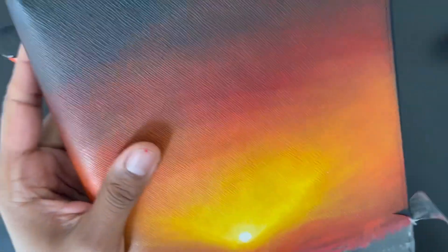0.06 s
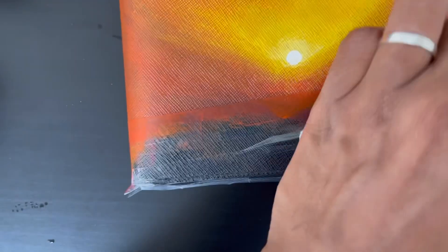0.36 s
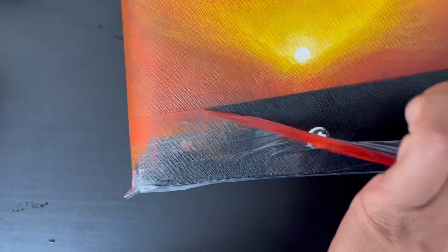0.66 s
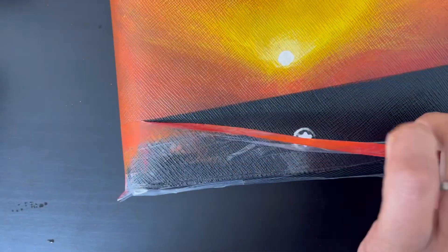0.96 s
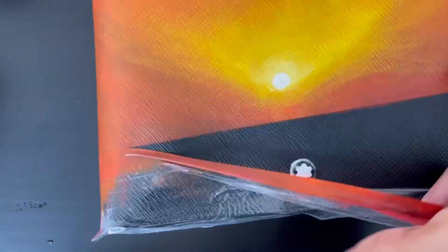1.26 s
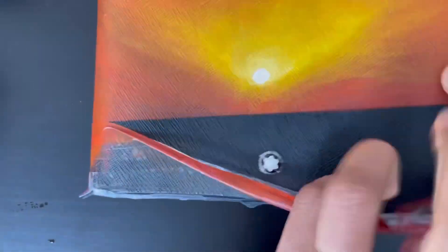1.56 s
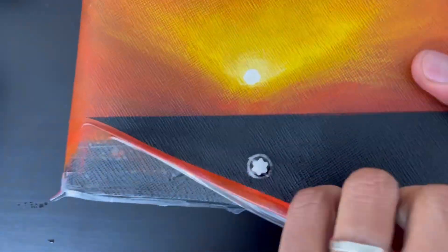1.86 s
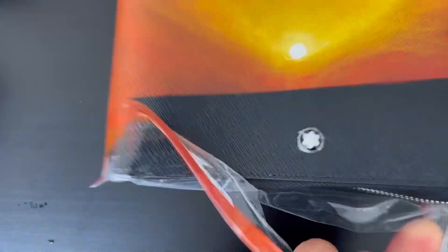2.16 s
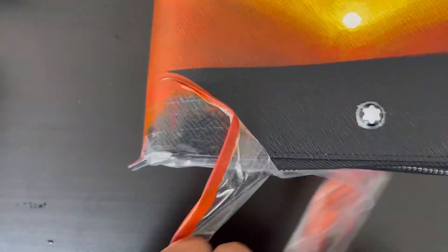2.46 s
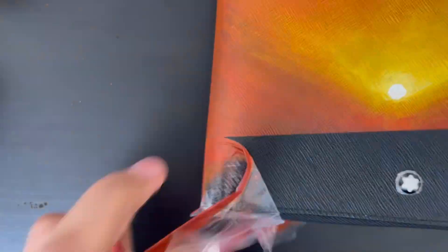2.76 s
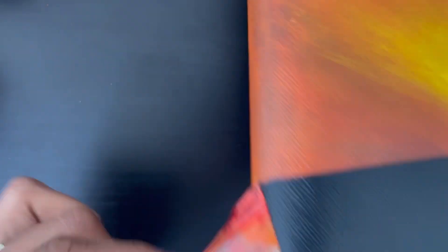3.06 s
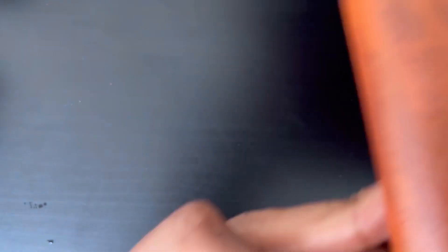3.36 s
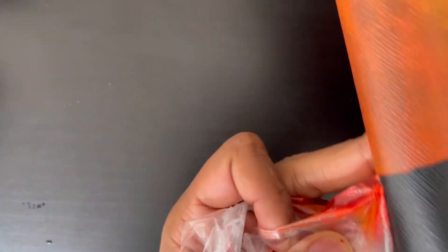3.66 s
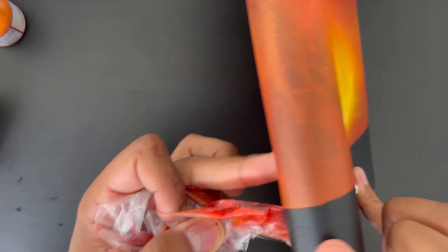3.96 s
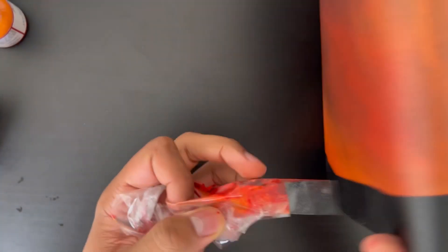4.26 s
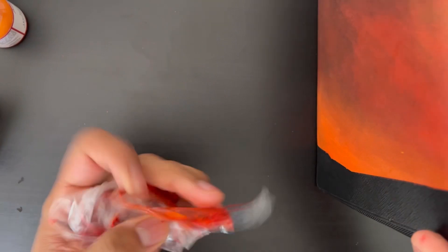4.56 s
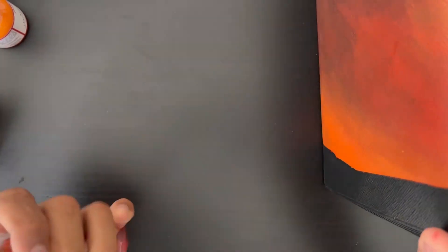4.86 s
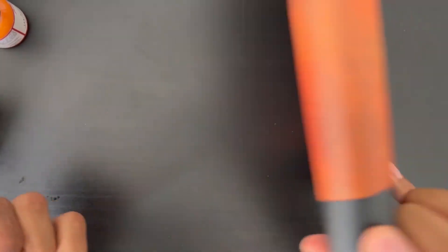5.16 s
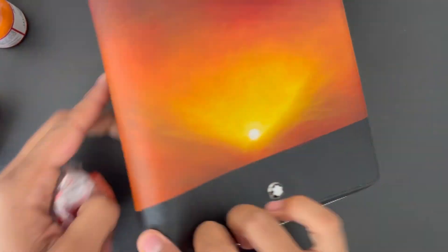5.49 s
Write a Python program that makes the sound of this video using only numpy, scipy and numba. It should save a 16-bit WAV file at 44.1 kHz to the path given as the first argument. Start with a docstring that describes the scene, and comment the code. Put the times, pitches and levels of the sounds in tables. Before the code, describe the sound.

After a brief, dull slide of leather on skin, sticky tape peels away from a wallet with soft, irregular crackles and a thin fizz. The final piece comes loose in a louder, stuttering rip with a few hollow taps on the leather. A hand then squeezes the loose plastic strip, giving crisp crinkles over a faint low rubbing. Everything is heard up close in a small, quiet room.

```python
"""Tape peeled off a leather wallet

Close to the microphone, in a small, quiet room, adhesive tape is pulled off a hand-held wallet: the glue
fizzes and lets go in ticks and short rips. The last end tears free with a stutter that drums on the
leather, then the strip is crumpled in one hand and its creases buckle."""
import sys
import numpy as np
from scipy import signal
from scipy.fft import rfft, irfft, next_fast_len
from scipy.io import wavfile
from scipy.ndimage import uniform_filter1d, map_coordinates
from numba import njit

SR = 44100
rng = np.random.default_rng(int(sys.argv[2]) if len(sys.argv) > 2 else 0)


def master_out(mix):
    """Clip the mix to full scale and print it as 16-bit PCM to the path in sys.argv[1]."""
    frames = np.transpose(np.atleast_2d(mix))
    ceiling = np.clip(frames, -1, 1)
    pcm = np.round(ceiling * 32767).astype(np.int16)
    wavfile.write(sys.argv[1], SR, pcm)


N = 243673
TOP_HZ = 16100  # upper limit of the microphone's band


# Rasp of the taut strip, heard close: (frequency [Hz], level [dB])
RASP_SPECTRUM = [(150, -12), (500, -11), (900, 0), (1500, -3), (2300, -0.5), (3300, -2.5), (5500, -16),
                 (10000, -41.5)]
# Fizz of the parting glue, heard close: (frequency [Hz], level [dB])
FIZZ_SPECTRUM = [(2000, -37), (4000, -9), (6000, 0), (8300, 6), (11000, -0.5), (14000, 9.5), (16000, -4)]
def peeling_front(rasp_db, fizz_db):
    """Countless glue strands part close to the microphone: the strip rasps and the front fizzes."""
    strands = grains(rate=3100, spread_db=6.5)
    rasp = amp(-2) * coloured(grains(rate=4000, spread_db=7.5), RASP_SPECTRUM)
    rasp += amp(-9.5) * taut_strip(strands, q=4.3)
    fizz = coloured(strands + grains(rate=660, spread_db=9.5), FIZZ_SPECTRUM)
    stick_slip = amp(2.92 * wobble(rate=70))
    rasp = amp(rasp_db - 1) * flexing(rasp, depth_db=4)
    fizz = amp(fizz_db + 0.5) * flexing(fizz, depth_db=3.5)
    return stick_slip * (rasp + fizz)


# Pulls of the hand on the tape: (start [s], length [s], rasp level [dB], fizz level [dB])
HAND_PULLS = [(.12, 0.018, -70, -66.5), (0.433, 0.13, -73, -67), (0.543, .1, -64, -67),
              (0.671, 0.337, -75.5, -70.5), (1.097, 0.45, -77.5, -75), (1.576, 0.066, -68.5, -77),
              (1.873, 0.11, -78, -66.5), (2.001, 0.059, -59.5, -69), (2.152, 0.097, -74, -73.5),
              (2.299, 0.4, -69, -70.5), (2.759, .06, -73, -67), (2.851, 0.28, -67.5, -66),
              (3.146, 0.081, -74.5, -71.5), (3.382, 0.056, -71.5, -73.5), (3.553, 0.066, -80.5, -70.5)]
def front_level(column, run_on_db):
    """Rasp (column 2) or fizz (3) in dB: the front moves with each pull and runs on after each tick."""
    pulls = [(row[0], row[1], row[column]) for row in HAND_PULLS]
    creep = (0.13, 3.58, -82.5)  # the stretched tape keeps creeping between pulls
    pulled = strokes(pulls + [creep], attack_s=0.019, release_t60=0.26)
    runs = [(row[0], 0.012, row[column] + run_on_db) for row in GLUE_TICKS]
    run_on = strokes(runs, attack_s=0.0026, release_t60=0.133)
    return decibels(np.hypot(pulled, run_on))


# The thickest glue strands letting go: (time [s], pitch [Hz], snap level [dB], crack level [dB])
GLUE_TICKS = [(0.3514, 3420, -65, -75), (0.5827, 2570, -51, -65), (0.6987, 2270, -49.5, -47),
              (0.7791, 2950, -58.5, -46.5), (0.8528, 3020, -54.5, -55), (0.8988, 1530, -57, -54.5),
              (0.9409, 1400, -64.5, -77), (1.0667, 2300, -56, -61.5), (1.1017, 5670, -60, -57),
              (1.1322, 2820, -53, -52), (1.1843, 3050, -55.5, -44), (1.2441, 1980, -48, -46),
              (1.3564, 3300, -68, -57), (1.4215, 2420, -55, -67), (1.5187, 2740, -52.5, -46.5),
              (1.575, 2080, -46, -40.5), (1.8993, 890, -52.5, -71), (1.97, 5720, -62.5, -59),
              (2.1623, 2130, -53.5, -45.5), (2.34, 1126, -61.5, -69), (2.508, 2170, -55, -58),
              (2.5658, 1910, -50.5, -48.5), (2.6496, 5430, -59, -51.5), (2.6556, 1870, -58, -53),
              (2.7707, 2440, -53, -52), (2.8505, 3020, -56.5, -54), (2.8909, 2570, -48.5, -69),
              (2.9921, 2140, -59, -49.5), (3.1069, 1630, -56, -48.5), (3.1409, 4700, -67, -50),
              (3.2549, 3780, -62, -57.5), (3.3371, 1625, -56, -50.5), (3.7105, 2060, -58.5, -58),
              (3.943, 4620, -44, -49), (3.959, 2700, -58, -48), (3.9703, 4640, -39, -47),
              (3.9832, 4050, -41.5, -48), (3.991, 3930, -50, -51), (4.0054, 4660, -36.5, -53)]
def glue_ticks(front_db):
    """Thick strands break one by one and flick the film, with smaller ones scattered between."""
    small = strays(front_db, count=230, pitch_hz=2430, pitch_spread=0.49,
                   over_db=0, spread_db=4, crack_db=0.5)
    return snaps(np.vstack([GLUE_TICKS, small]), q=3.25, rise_s=0.00018, crack_hz=11650,
                 crack_rise_s=0.000088, flutter_db=-9, flutter_t60=0.028)


# Short rips along the wallet: (start [s], length [s], relative level [dB])
GLUE_RIPS = [(.700, .012, -56.5), (1.510, 0.016, -55), (1.568, 0.0078, -52.5), (1.575, 0.0058, -57),
             (2.143, 0.0264, -45), (2.888, 0.019, -48)]
def glue_rips():
    """A stretch of glue gives way at once, in a dense burst of rasp and fizz."""
    strands = grains(rate=9300, spread_db=7)
    tearing = coloured(strands, RASP_SPECTRUM) + coloured(strands, FIZZ_SPECTRUM)
    return amp(-9.5) * bursts(GLUE_RIPS, release_t60=0.0085) * tearing


# Resonance of the strip between hand and wallet: (time [s], pitch [Hz])
STRIP_PITCH = [(.47, 5730), (.58, 2900), (.66, 2070), (1.12, 3030), (2.04, 2270), (2.4, 1720), (2.85, 2570),
               (3.2, 1460), (3.92, 4500), (4.16, 5330)]
def taut_strip(x, q):
    """The stretched strip rings, lower as the freed length grows and higher with tension."""
    pitch_hz, = curves(STRIP_PITCH)
    tuning = 2 * np.sin(np.pi * pitch_hz / SR)
    return unit(glide(x, tuning, 1 / q) / np.sqrt(tuning))


# The film under tension, heard close: (frequency [Hz], level [dB])
TAUT_SPECTRUM = [(500, -12), (1500, -5), (2300, -0.5), (3400, 5), (4000, -3.5), (5100, 9.5), (6200, 6),
                 (7200, -9.5), (9000, -7.5), (12000, -10), (16000, -47)]
# The film slack in the hand: (frequency [Hz], level [dB])
SLACK_SPECTRUM = [(500, -14.5), (1200, -3.5), (2200, -5.5), (3300, 6.5), (4200, -11.5), (5600, 0.5),
                  (7000, -14), (8600, -3.5), (11000, -15.5), (16000, -52)]
# Many creases collapsing together: (start [s], length [s], level [dB])
COLLAPSES = [(4.013, 0.0047, -46), (4.151, 0.0088, -40.5), (4.582, 0.0025, -36), (4.859, 0.0079, -38.5),
             (5.076, 0.0025, -37)]
def crumpling(rub_db, crinkle_db):
    """The last end scrapes free through the taut strip; then the slack, lower film buckles in clumps."""
    slack, = curves([(4.3, 0.014), (4.56, 0.79)])

    def film(x):
        return (1 - slack) * coloured(x, TAUT_SPECTRUM) + slack * coloured(x, SLACK_SPECTRUM)

    gripped = np.arange(N) / SR > LAST_TEAR[0][0]
    buckles = grains(rate=4000, spread_db=8) * amp(3 * wobble(rate=170))
    scrape = (1 - slack) * amp(-1) * taut_strip(rng.standard_normal(N), q=6.5)
    crinkle = amp(crinkle_db) * flexing(film(buckles) + scrape, depth_db=3.5)
    rub = rubbing(buckles, rub_db)
    collapses = bursts(COLLAPSES, release_t60=0.014) * film(rng.standard_normal(N))
    return gripped * (crinkle + rub) + collapses


# The last end scraping off the wallet: (time [s], rub level [dB], crinkle level [dB])
LAST_TEAR = [(3.904, -88, -70), (3.918, -60, -51.5), (3.96, -55.5, -53), (4.022, -47, -41),
             (4.095, -58, -52.5), (4.16, -47, -41), (4.2, -47.5, -46.5), (4.24, -43, -46),
             (4.258, -56.5, -63.5), (4.355, -58.5, -56.5), (4.41, -66, -68), (4.48, -66.5, -62)]
# Fingers closing on the loose strip: (start [s], length [s], level [dB])
FINGER_SQUEEZES = [(4.555, 0.044, -43), (4.675, 0.022, -47), (4.765, 0.044, -46.5), (4.855, 0.035, -44),
                   (4.942, 0.028, -46), (5.075, 0.019, -57), (5.205, 0.0097, -59.5), (5.35, 0.027, -48)]
def crumple_levels():
    """Rub and crinkle in dB: first the tear, then the fist; each large crease sets neighbours buckling."""
    tear_rub_db, tear_crinkle_db = curves(LAST_TEAR)
    steady_grip = (4.56, 0.898, -54.5)
    pressure = strokes(FINGER_SQUEEZES + [steady_grip], attack_s=0.006, release_t60=0.24)
    neighbours = [(s, 0.01, db - 16.5) for s, _, db in LARGE_CREASES]
    spread = strokes(neighbours, attack_s=0.00081, release_t60=0.12)
    rub = np.hypot(amp(tear_rub_db), amp(-12) * pressure)
    crinkle = np.hypot(amp(tear_crinkle_db), np.hypot(pressure, spread))
    return decibels(rub), decibels(crinkle)


# The largest creases buckling near the microphone: (time [s], pitch [Hz], relative level [dB])
LARGE_CREASES = [(0.0454, 4440, -45), (4.1221, 5950, -40.5), (4.155, 5650, -28.5), (4.2102, 2280, -40.5),
                 (4.4625, 5100, -51), (4.5173, 2460, -47.5), (4.5234, 3970, -44.5), (4.5595, 5200, -39),
                 (4.5842, 3400, -34.5), (4.6056, 4360, -42), (4.6579, 4400, -44), (4.7282, 3770, -42.5),
                 (4.7508, 3530, -42.5), (4.7798, 5700, -33.5), (4.8085, 3170, -39), (4.818, 3230, -40.5),
                 (4.841, 3800, -44), (4.8632, 3480, -33.5), (4.8797, 1300, -34), (4.9207, 5840, -42.5),
                 (4.9424, 2800, -40.5), (4.9532, 2980, -35.5), (4.9584, 2170, -33), (4.9842, 3100, -35),
                 (5.017, 5720, -34.5), (5.0427, 3000, -39.5), (5.0774, 5000, -34.5), (5.15, 4100, -41),
                 (5.1671, 2700, -39.5), (5.1711, 2600, -44), (5.2271, 3100, -43), (5.272, 2870, -44),
                 (5.2945, 2360, -37.5), (5.334, 2960, -39), (5.3592, 4970, -35.5), (5.396, 2740, -42),
                 (5.4685, 3080, -46.5)]
def creases(crinkle_db, lag_s=0.002, second_db=-4.5, crack_db=-9.5):
    """Large creases give way in two snaps, small ones in one; the closed fingers shade the top octave."""
    small = strays(crinkle_db, count=520, pitch_hz=4300, pitch_spread=0.55,
                   over_db=-5.5, spread_db=-0.5, crack_db=6)
    s, pitch_hz, db = np.transpose(LARGE_CREASES)
    lag, detune = rng.lognormal(0, 0.25, (len(s), 2)).T
    first = np.transpose([s, pitch_hz, db, db + crack_db])
    second = np.transpose([s + lag_s * lag, pitch_hz * detune, db + second_db, db + second_db + crack_db])
    buckling = snaps(np.vstack([first, second, small]), q=2.3, rise_s=0.00031, crack_hz=7740,
                     crack_rise_s=0.00047, flutter_db=-28, flutter_t60=0.038)
    fingers = signal.butter(2, 10500, fs=SR, output="sos")
    return amp(-2.5) * signal.sosfilt(fingers, buckling)


# Dull rub of the gripped tape: (frequency [Hz], level [dB])
RUB_SPECTRUM = [(100, -14.5), (250, 3.5), (400, -4), (650, 5), (1200, 0), (2000, -2.5), (4000, -18.5)]
def rubbing(buckles, rub_db):
    """The tape rubs as it buckles, a low grainy sound under the crinkle."""
    return amp(rub_db - 1) * coloured(buckles + grains(rate=1700, spread_db=5), RUB_SPECTRUM)


def stutter(start_s=4.2102, count=7, slips_per_s=195, pitch_hz=520):
    """Just before it parts, the last patch of glue sticks and slips in a quick run of dull snaps."""
    tone, size = rng.standard_normal((count, 2)).T
    times = start_s + np.arange(count) / slips_per_s
    snap_db, crack_db = -42 + 1.7 * size, -49 + 1.8 * size
    rows = np.transpose([times, pitch_hz * np.exp(0.15 * tone), snap_db, crack_db])
    return snaps(rows, q=1, rise_s=0.00037, crack_hz=3500,
                 crack_rise_s=0.00025, flutter_db=-18, flutter_t60=0.04)


# Tugs that drum on the wallet: (time [s], level [dB], pitch [Hz])
WALLET_TUGS = [(1.244, -65.5, 215), (1.321, -62.5, 216), (1.598, -62, 218), (1.638, -59, 213.7),
               (2.155, -59, 209), (2.186, -59.5, 212), (2.65, -62.5, 202), (2.893, -50.5, 206),
               (3.227, -60.5, 204), (3.338, -58.5, 203), (3.414, -62, 212), (4.017, -43, 270),
               (4.222, -30.5, 407), (4.2411, -27, 325), (4.266, -38.5, 320)]
# Modes of the leather panel: (multiple of the pitch, relative level [dB], t60 at a 200 Hz pitch [s])
WALLET_MODES = [(1.002, 2, 0.12), (1.4, -4, 0.16), (2.13, -3.5, 0.094)]
def wallet():
    """Each tug rings the leather panel, higher where the grip stiffens it."""
    out, t = np.zeros(N), np.arange(SR // 5) / SR
    attack = 1 - np.exp(-t / 0.0013)
    for s, db, pitch_hz in WALLET_TUGS:
        damping = (pitch_hz / 200) ** 2.3  # a firmer grip also kills the ring sooner
        ring = np.zeros(len(t))
        for ratio, mode_db, t60 in WALLET_MODES:
            decay = amp(mode_db + rng.normal() - 60 * t * damping / t60)
            ring += decay * np.sin(2 * np.pi * pitch_hz * ratio * t)
        add(out, s, amp(db) * ring * attack)
    return out


# The wallet sliding in the hand: (time [s], level [dB])
WALLET_SLIDE = [(0, -48.5), (.135, -60), (.145, -100)]
# Leather on skin, heard close: (frequency [Hz], level [dB])
LEATHER_SPECTRUM = [(20, -11), (50, 3.5), (130, -7), (215, 1), (330, -12.5), (750, -16), (2200, -25.5),
                    (6700, -24), (12000, -37), (15000, -64)]
# Rumble of the fist near the microphone: (frequency [Hz], level [dB])
FIST_SPECTRUM = [(20, -7), (48, -5), (70, -6.5), (110, -12.5), (200, -16.5), (400, -19.5), (1000, -69)]
def hands():
    """Leather slides over skin at first; later the working fist rumbles softly."""
    slide_db, = curves(WALLET_SLIDE)
    fist_db, = curves([(3.9, -110), (3.92, -56.5), (4.25, -61), (4.45, -60),
                       (4.9, -62), (5.15, -62), (5.5, -62.5)])
    slide = amp(slide_db) * noise(LEATHER_SPECTRUM)
    rumble = amp(fist_db + 0.98 * wobble(rate=12)) * noise(FIST_SPECTRUM)
    return slide + rumble


# Decay of the small room: (frequency [Hz], t60 [s])
ROOM_DECAY = [(370, 0.36), (1200, 0.2), (4000, 0.26), (12000, 0.16)]
def room(x, delay_s=0.004):
    """The walls return a short diffuse tail to the microphone, each frequency dying at its own speed."""
    hz, t, spectra = signal.stft(rng.standard_normal(SR // 2), SR, nperseg=256)
    decay = amp(-60 * t / along(ROOM_DECAY, hz)[:, None])
    tail = signal.istft(spectra * decay, SR, nperseg=256)[1]
    tail = np.concatenate([np.zeros(int(delay_s * SR)), tail])
    return signal.fftconvolve(x, tail / np.linalg.norm(tail))[:N]


# The quiet room around the microphone: (frequency [Hz], level [dB])
ROOM_TONE_SPECTRUM = [(26, -31), (41, 11), (65, -23.5), (135, 4), (480, -10.5), (650, -6), (1200, -18.5),
                      (15000, -37)]
def room_tone():
    """A faint, low, steady noise lies behind everything."""
    return amp(-77) * noise(ROOM_TONE_SPECTRUM)


def snaps(rows, q, rise_s, crack_hz, crack_rise_s, flutter_db, flutter_t60):
    """Each (s, Hz, snap dB, crack dB) row shakes a patch of film: a bright crack, a ring, a flutter."""
    out, t = np.zeros(N), np.arange(1024) / SR

    def at_level(x, db):  # as much energy as 3 ms at this level
        return amp(db) * x * np.sqrt(0.003 * SR / np.sum(x ** 2))

    def swell(peak_s):
        return t / peak_s * np.exp(1 - t / peak_s)

    for s, pitch_hz, snap_db, crack_db in rows:
        patch_noise, crack_noise = rng.standard_normal((2, len(t)))
        flutter = amp(flutter_db - 60 * t / flutter_t60)
        # the patch flips over in a cycle or two, then shivers
        flip = swell(rise_s) * np.sin(2 * np.pi * pitch_hz * t)
        shiver = resonance(3 * patch_noise * (swell(rise_s) + flutter), pitch_hz, q, skirt_q=0.32)
        edge_hz = min(crack_hz * rng.lognormal(0, 0.31), TOP_HZ)
        crack = resonance(crack_noise * (swell(crack_rise_s) + flutter / 2), edge_hz, q=1.3, skirt_q=0.68)
        add(out, s, at_level(flip + shiver, snap_db) + at_level(crack, crack_db))
    return out


def strays(level_db, count, pitch_hz, pitch_spread, over_db, spread_db, crack_db):
    """Rows of small snaps at random times and pitches, sized by how hard the tape is being worked."""
    when = rng.integers(0, N, count)
    tone, size, edge = np.clip(rng.standard_normal((3, count)), -2, 1.6)
    hz = pitch_hz * np.exp(pitch_spread * tone)
    db = level_db[when] + over_db + spread_db * size
    rows = np.transpose([when / SR, hz, db, db + crack_db + spread_db * edge])
    return rows[level_db[when] > level_db.min() + 2]


def flexing(x, depth_db):
    """The film keeps changing shape, so patches of its spectrum swell and fade."""
    spectra = signal.stft(x, nperseg=256)[2]
    patches = uniform_filter1d(rng.standard_normal(spectra.shape), size=8, axis=0)
    patches = unit(uniform_filter1d(patches, size=9, axis=1))
    return unit(signal.istft(spectra * amp(depth_db * patches), nperseg=256)[1][:N])


def grains(rate, spread_db):
    """Tiny impulses of widely different sizes at random times, on average rate a second."""
    size_db = spread_db * np.minimum(rng.standard_normal(N), 2)
    return (rng.random(N) < rate / SR) * rng.choice([-1, 1], N) * amp(size_db)


def bursts(rows, release_t60):
    """The envelope of (start, length, dB) runs that begin at once, hold and die away."""
    out, t = np.zeros(N), np.arange(SR // 10) / SR
    for s, length, db in rows:
        add(out, s, amp(db - 60 * np.maximum(t - length, 0) / release_t60))
    return out


def strokes(rows, attack_s, release_t60):
    """The envelope of (start, length, dB) movements that rise, hold and relax; overlaps add in power."""
    power = np.zeros(N)
    for s, length, db in rows:
        t = np.arange(int((length + release_t60) * SR)) / SR
        rise = np.minimum(t / attack_s, 1)
        hold_and_relax = amp(db - 60 * np.maximum(t - length, 0) / release_t60)
        add(power, s, (rise * hold_and_relax) ** 2)
    return np.sqrt(power)


@njit
def glide(x, tuning, damping):
    """x through one resonance whose tuning changes sample by sample."""
    out, speed, position = np.zeros(len(x)), 0.0, 0.0
    for i in range(len(x)):
        position += tuning[i] * speed
        speed += tuning[i] * (x[i] - position - damping * speed)
        out[i] = speed
    return out


def resonance(x, centre_hz, q, skirt_q):
    """x through a damped resonance with steepened skirts."""
    def peak(hz, sharpness):
        return 1j * hz * centre_hz / (sharpness * (centre_hz ** 2 - hz ** 2) + 1j * hz * centre_hz)

    return filtered(x, lambda hz: peak(hz, q) * peak(hz, skirt_q))


def coloured(x, spectrum, size=2048):
    """x through a causal filter with this spectrum, at rms 1."""
    gain = amp(along(spectrum, np.fft.rfftfreq(size, 1 / SR)))
    cepstrum = irfft(np.log(gain))
    response = irfft(np.exp(rfft(2 * cepstrum[:size // 2], size)))
    return unit(signal.fftconvolve(x, response)[:len(x)])


def noise(spectrum):
    """Smooth noise of rms 1 with this spectrum."""
    return unit(filtered(rng.standard_normal(N), lambda hz: amp(along(spectrum, hz))))


def filtered(x, response):
    """x through a filter given as a function of frequency."""
    size = next_fast_len(len(x) + min(len(x), SR // 2), real=True)
    return irfft(rfft(x, size) * response(np.fft.rfftfreq(size, 1 / SR)), size)[:len(x)]


def wobble(rate):
    """A smooth random curve, rate knots a second."""
    knots = rng.standard_normal(int(N * rate / SR) + 4)
    return map_coordinates(knots, [np.arange(N) * rate / SR])


def curves(rows):
    """One value per sample for each column after the time."""
    times, *columns = np.transpose(rows)
    return [np.interp(np.arange(N) / SR, times, column) for column in columns]


def along(points, hz):
    """(Hz, value) points interpolated on a log frequency axis."""
    point_hz, values = np.transpose(points)
    return np.interp(np.log(hz + 1), np.log(point_hz + 1), values)


def add(track, s, sound):
    """Mix a sound into the track at time s."""
    part = track[max(0, round(s * SR)):][:len(sound)]
    part += sound[:len(part)]


def amp(db):
    """Decibels to gain."""
    return 10 ** (np.asarray(db) / 20)


def decibels(gain):
    """Gain to decibels."""
    return 20 * np.log10(gain + 1e-9)


def unit(x):
    """x scaled to rms 1."""
    return x / np.sqrt(np.mean(x ** 2) + 1e-20)


def scene():
    """Tape, wallet and hands close to one microphone, with the small room behind them."""
    rasp_db, fizz_db = front_level(column=2, run_on_db=-18), front_level(column=3, run_on_db=-15.5)
    rub_db, crinkle_db = crumple_levels()
    peel = peeling_front(rasp_db, fizz_db) + glue_rips() + glue_ticks((rasp_db + fizz_db) / 2)
    crumple = crumpling(rub_db, crinkle_db) + creases(crinkle_db)
    near = peel + crumple + stutter() + wallet()
    return (near + amp(-12.5) * room(near) + hands() + room_tone())[None]


def record(dry):
    """The microphone passes nothing above its band limit."""
    return np.array([filtered(channel, lambda hz: hz < TOP_HZ) for channel in dry])


dry = scene()
out = record(dry)
master_out(out)
```